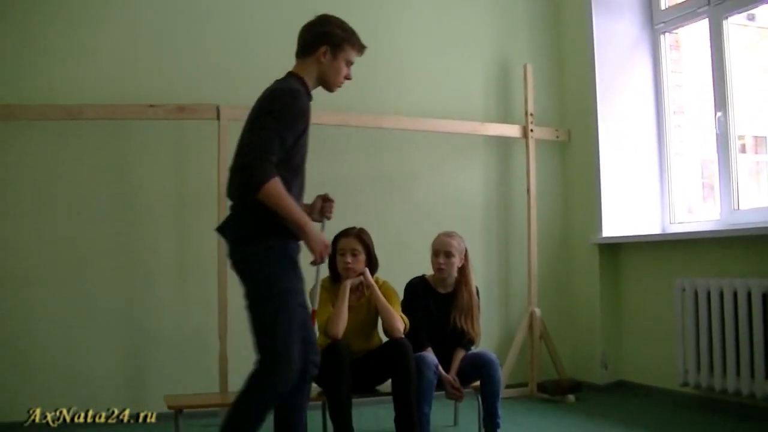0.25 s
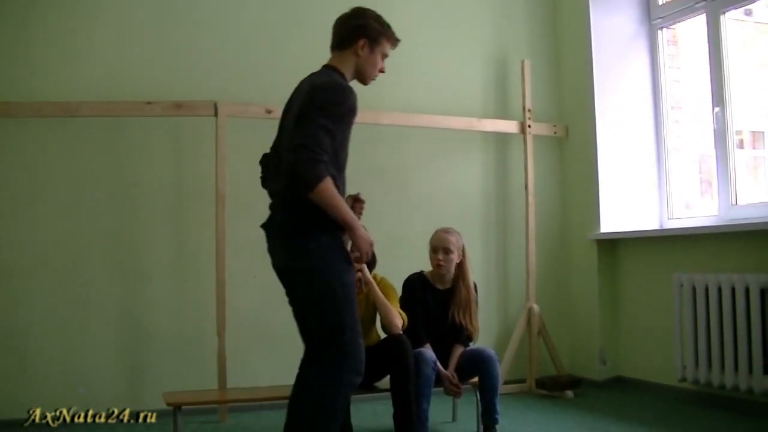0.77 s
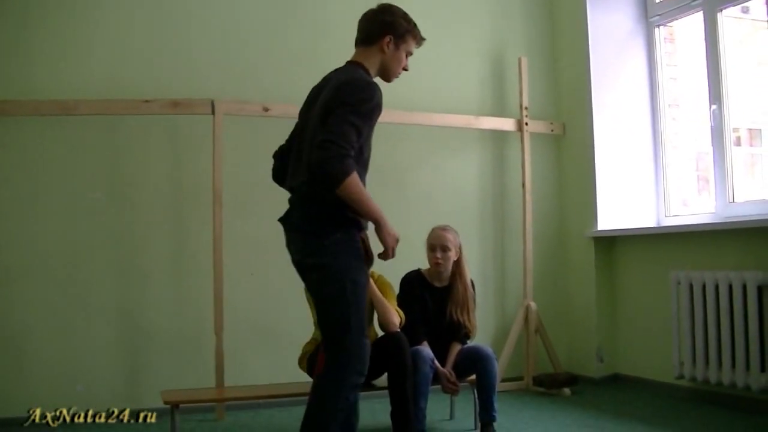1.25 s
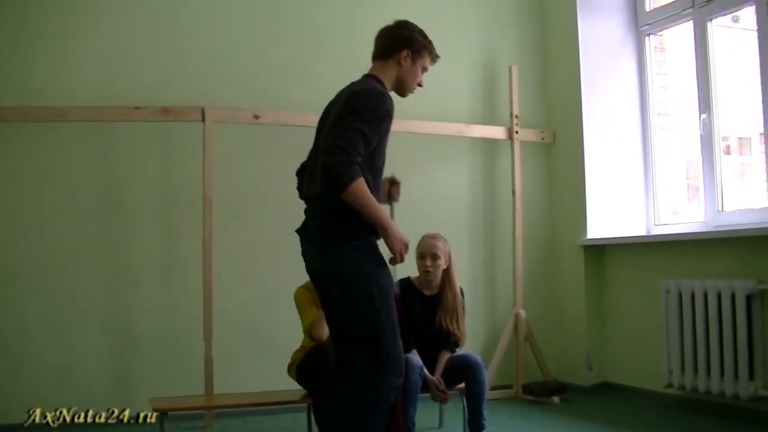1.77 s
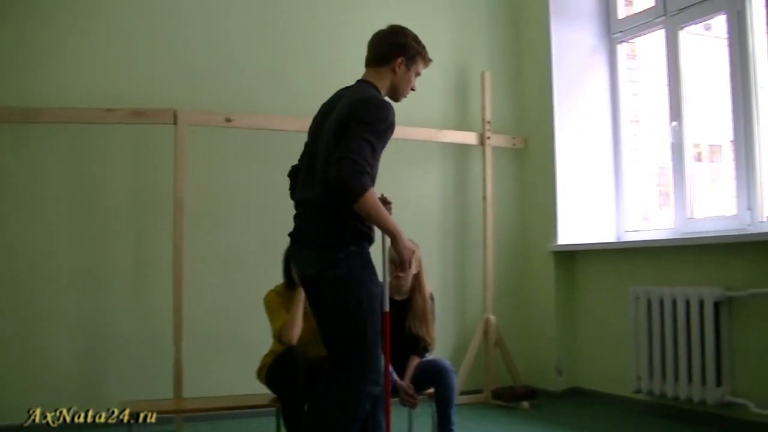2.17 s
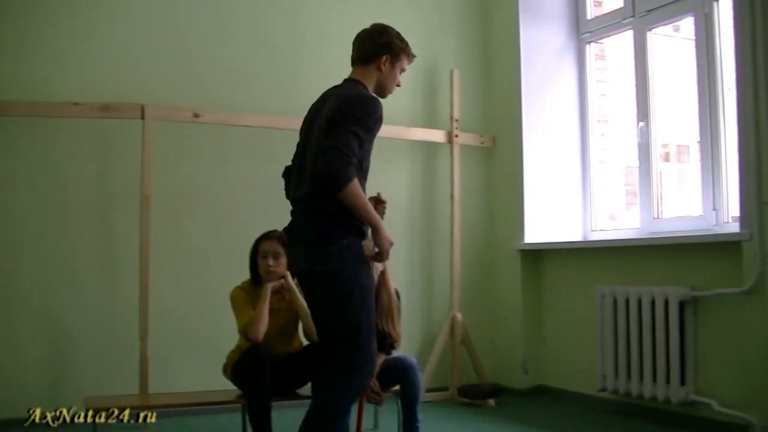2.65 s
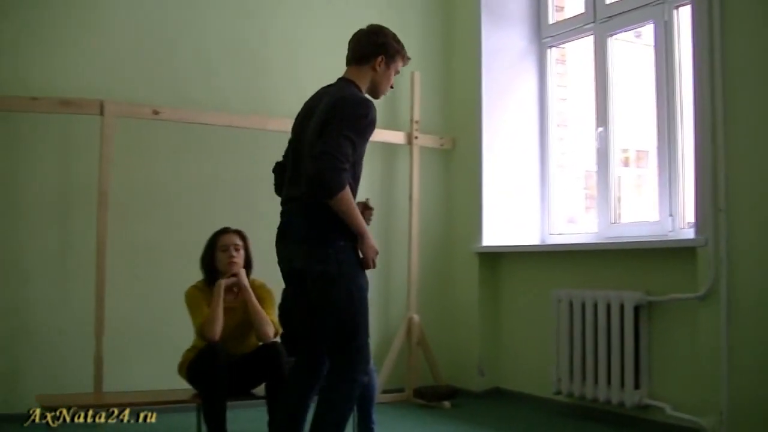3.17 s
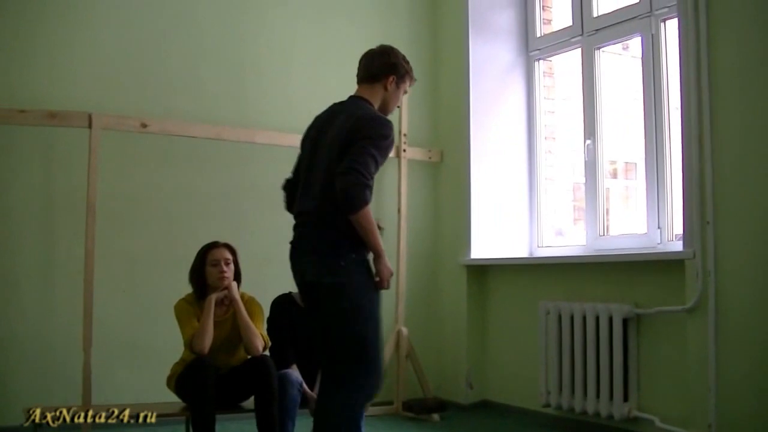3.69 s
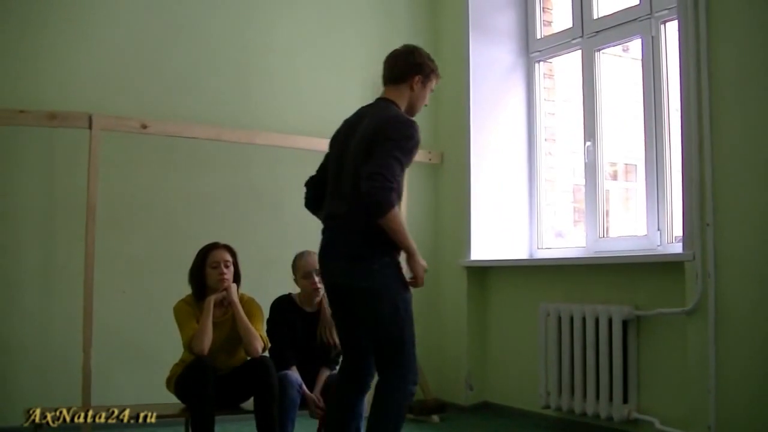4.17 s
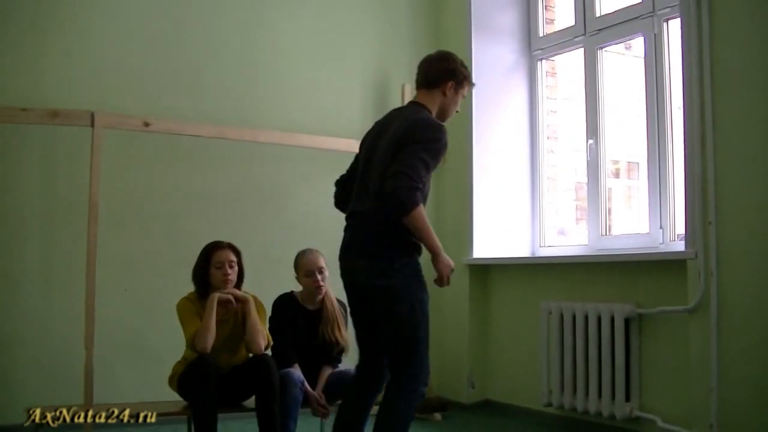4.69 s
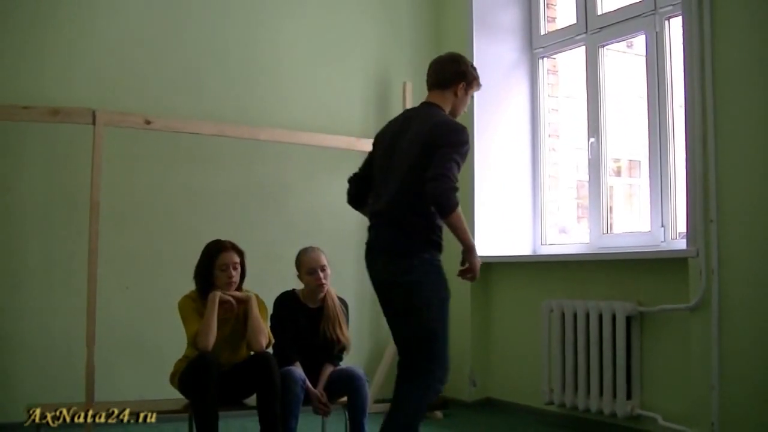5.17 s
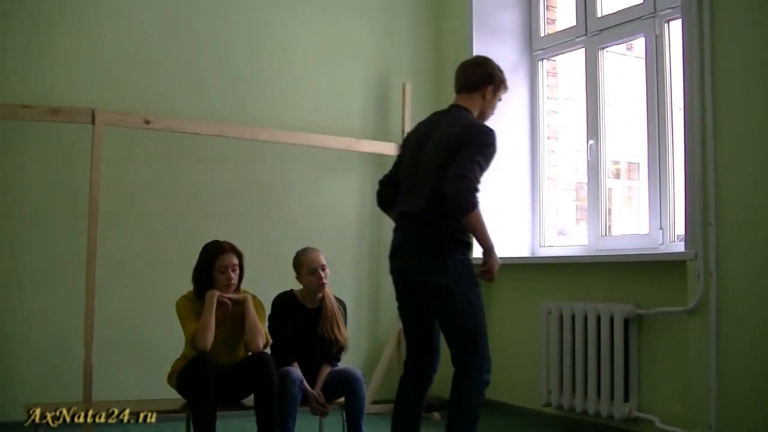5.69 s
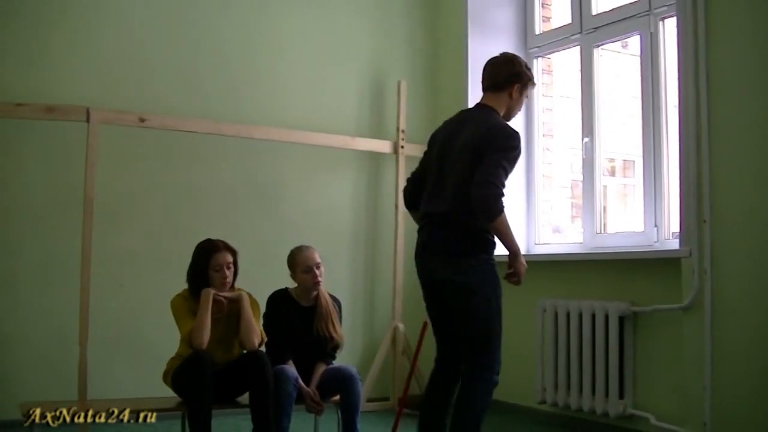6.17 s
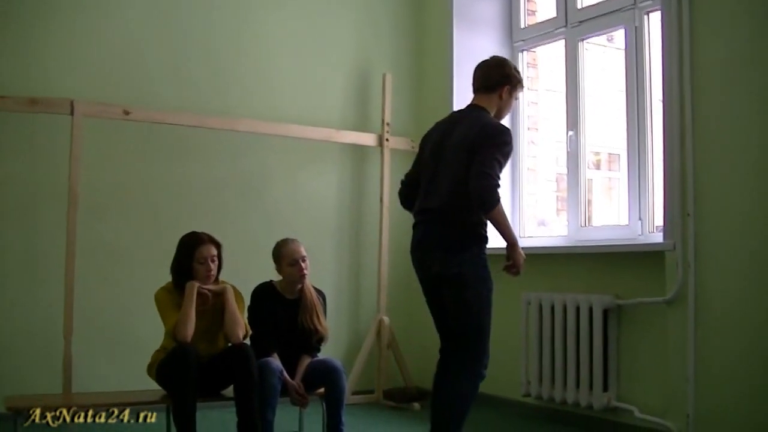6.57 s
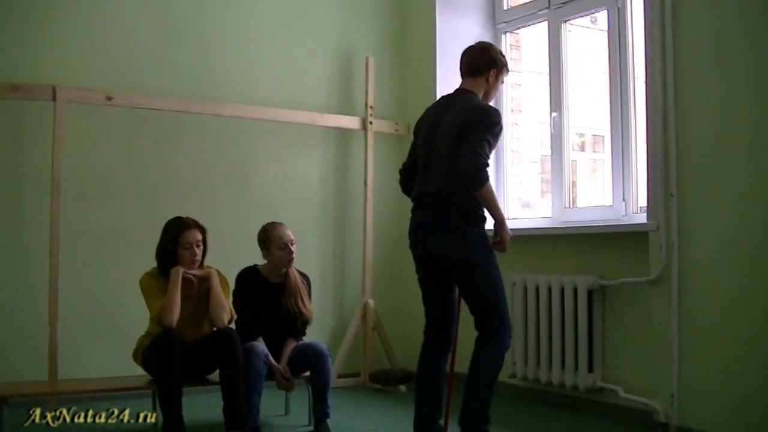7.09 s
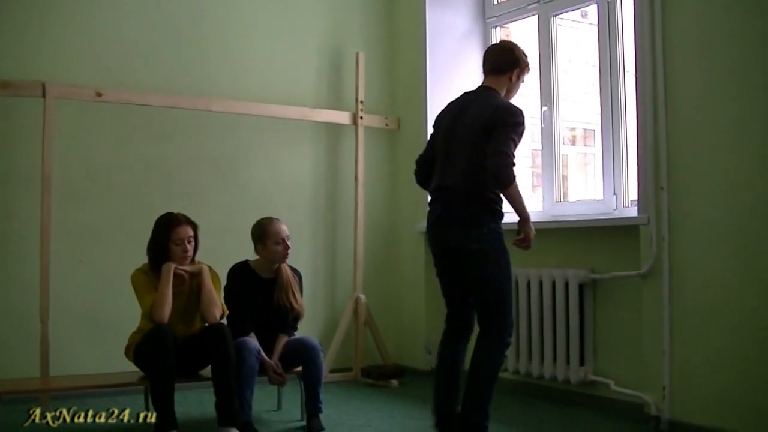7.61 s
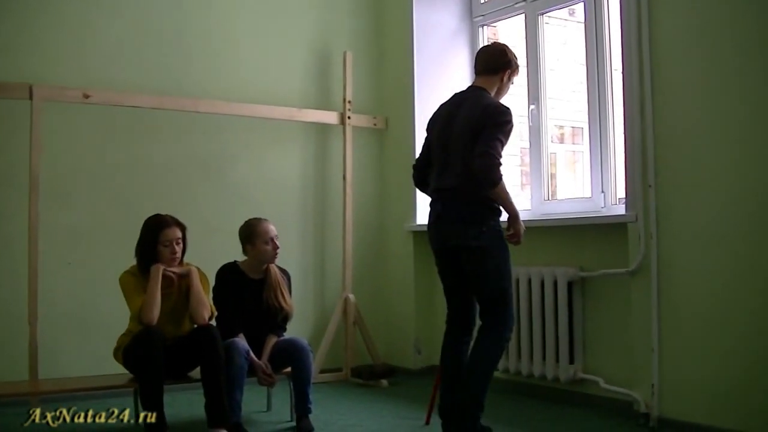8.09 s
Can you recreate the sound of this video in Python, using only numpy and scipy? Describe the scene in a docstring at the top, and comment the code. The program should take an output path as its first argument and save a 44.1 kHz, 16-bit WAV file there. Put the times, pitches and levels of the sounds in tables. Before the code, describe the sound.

Three hollow woody knocks of a walking stick, each a tip tap followed at once by a dull floor thump, echo off hard walls. The first is muffled and quieter, the later two brighter and louder. Between them come very quiet pats of soft soles and short irregular swishes of trousers. Room air, microphone hiss and a faint hum lie behind, with a low rumble swelling late. The microphone stands in the room, capturing plenty of echo.

```python
"""A metal walking stick knocks on the covered floor of a bare, ringing classroom as a man walks slowly.
Each knock is noise shaped by tip, floor and tube, heard through an echo, plus ringing standing waves.
Soft footfalls are shaped echoes too; trousers and soles swish as noise that swells with each stroke.
Behind them lie noise for room air and microphone hiss, a wavering hum, a faint dying ring made of tones,
and a low rumble, a tone with its octave, that swells late."""
import sys
import numpy as np
from scipy import signal
from scipy.fft import rfft, irfft, next_fast_len
from scipy.io import wavfile
from scipy.ndimage import uniform_filter1d, map_coordinates

SR = 44100
rng = np.random.default_rng(int(sys.argv[2]) if len(sys.argv) > 2 else 0)


def int16_out(signal):
    """Quantize to a 16-bit WAV file."""
    q = np.round(np.clip(np.atleast_2d(signal).T, -1, 1) * 32767)
    wavfile.write(sys.argv[1], SR, q.astype(np.int16))


N = 367794

# Knocks of the stick; all levels are trimmed further by the functions below:
# (time [s], knock level [dB], then relative to it: thump [dB], clack [dB], tube [dB], standing waves [dB],
#  tip hardness [Hz], delay until the weight lands [s], direct share of the thump [dB],
#  low floor resonance [Hz], its lift [dB], high floor resonance [Hz], its lift [dB])
STICK_KNOCKS = [(1.836, -35, -1.5, -20.5, -23, -11, 1480, 0.0071, -1, 296, 6, 778, 7.8),
                (4.292, -60, -5, -14, -18, -2, 1300, 0.00504, -8, 256, 14, 880, 2.6),
                (4.515, -26.5, -8.5, -14.5, -10, -15.5, 2800, .007, -6, 258, 4.6, 566, 4.9),
                (6.564, -24.5, -2.5, -15.5, -33.5, -5, 4860, 0.0086, -3, 333, 13, 703, 9.8)]


def stick():
    """The tip lands; a moment later the weight comes down, the floor thumps and the shaft rattles."""
    out = np.zeros((2, N))
    for (s, db, thump_db, clack_db, tube_db, waves_db, hard_hz, lag, direct_db,
         low_hz, low_db, high_hz, high_db) in STICK_KNOCKS:
        tip = room(direct_db=-20, early_db=-10, early_s=0.034, rise_s=0.0068)
        add(out, amp(db - 8) * floor_knock(tip, high_hz, high_db), s)
        add(out, amp(db + clack_db - 6) * hard_clack(tip, hard_hz), s)

        weight_s = s + lag
        weight = room(direct_db, early_db=-19.5, early_s=0.011, rise_s=0.0034)
        add(out, amp(db + thump_db - 3.5) * floor_thump(weight, low_hz, low_db), weight_s)
        shaft = room(direct_db=-4, early_db=7.5, early_s=0.025, rise_s=0.002)
        add(out, amp(db + tube_db - 11) * struck(shaft, tube), weight_s)
        add(out[:1], amp(db + waves_db) * standing_waves()[None], weight_s)
    return out


# Knocking part of the floor's sound: (frequency [Hz], level [dB per Hz])
KNOCK_TONE = [(250, -20.5), (400, -3.5), (490, 2.5), (600, -1), (690, -3.5), (830, -3), (980, -8.5),
              (1100, -13), (1300, -23), (1700, -39), (4000, -78.5)]


def floor_knock(echo, resonance_hz, lift_db):
    """The floor answers the tip, lifted at a resonance of that spot."""
    return struck(echo, lambda hz: causal(KNOCK_TONE, hz) * bump(hz, resonance_hz, width_hz=60, db=lift_db))


# Hard contact of the tip: (frequency [Hz], level [dB per Hz])
CLACK_TONE = [(700, -31), (1150, 3), (1420, 6), (1650, 2), (2200, 1.5), (3000, -3.5), (3800, -6.5),
              (5000, -11), (7000, -31.5), (14000, -47.5)]


def hard_clack(echo, hard_hz):
    """A soft landing lasts longer and so loses its treble, above the hardness frequency."""
    return struck(echo, lambda hz: causal(CLACK_TONE, hz) / (1 + 1j * hz / hard_hz) ** 2)


# Dull part of the floor's sound: (frequency [Hz], level [dB per Hz])
THUMP_TONE = [(30, -28.5), (62, -8.5), (82, -10), (102, -9.5), (140, -6), (200, -4), (300, 3), (400, -0.5),
              (520, -14), (900, -74)]


def floor_thump(echo, resonance_hz, lift_db):
    """The weight pushes the floor, which sounds dully, lifted at a low resonance of that spot."""
    return struck(echo, lambda hz: causal(THUMP_TONE, hz) * bump(hz, resonance_hz, width_hz=130, db=lift_db))


# Bending resonances of the metal tube: (frequency [Hz], width [Hz], level [dB])
TUBE_MODES = [(2020, 120, 0.5), (2076, 64, 6), (2260, 230, 2), (2550, 32, 5.5), (2760, 56, -5),
              (3370, 120, -7), (3790, 110, -8.5)]
# How strongly the blow drives the tube: (frequency [Hz], level [dB])
TUBE_DRIVE = [(500, -14.5), (1200, 2), (4000, -5.5), (6000, -8.5), (9000, -29.5), (15000, -51)]


def tube(hz):
    """The shaft bends at its resonances; the padded tip hardly reaches the highest ones."""
    modes = 0
    for k, (centre, width, db) in enumerate(TUBE_MODES):
        sign = (-1) ** k  # neighbouring resonances move in opposite directions
        modes = modes + sign * amp(db) * resonance(hz, centre, width)
    return modes * causal(TUBE_DRIVE, hz)


# Standing waves between the walls: (frequency [Hz], level [dB], time to fall 60 dB [s])
WALL_WAVES = [(62.8, -23.5, 2.1), (75, -28.5, 1.9), (100, -24, 1.3), (180.1, -8, 1.0), (257.5, -5, 1),
              (306, -9.5, 1.1), (382, -11.5, 1.62), (457, -7, 0.79), (554, -12.5, 0.89), (599, -10.5, 0.96),
              (674, -14, 0.62), (958, -12.5, 0.85)]


def standing_waves():
    """The weight on the floor sets tones between the walls ringing, a little differently each time."""
    t = np.arange(2 * SR) / SR
    waves = np.zeros(len(t))
    for hz, db, t60 in WALL_WAVES:
        fading = amp(db + rng.normal(0, 1) - 60 * t / t60)
        waves += fading * np.sin(2 * np.pi * (hz * t + rng.random()))
    return waves * (1 - np.exp(-t / 0.0099))  # builds up over about 10 ms


# Soft footfalls, levels trimmed further in footfalls():
# (time [s], pat level [dB], then relative to it: boom [dB], scuff [dB])
FOOTFALLS = [(0.002, -54.5, -12, -26), (0.621, -62, -29, -3.5), (2.974, -67, 3, -4.5)]
# Tone of the pat, the floor's boom and the scuff: (frequency [Hz], level [dB])
PAT_TONE = [(60, -26), (90, -7), (125, -8), (175, 0), (215, -5), (260, -4.5), (420, -7.5),
            (700, -20.5), (2000, -37), (6000, -54)]
BOOM_TONE = [(22, -2.5), (45, -3), (65, -1.5), (100, -12), (200, -37), (600, -67)]
SCUFF_TONE = [(300, -3.5), (800, 3.5), (3000, -8), (7000, -4), (11000, -15), (15000, -25)]


def footfalls():
    """Soft soles give a dull pat, a low boom of the floor and a short scuff."""
    out = np.zeros((2, N))
    for s, db, boom_db, scuff_db in FOOTFALLS:
        echo = room(direct_db=-14, early_db=-18, early_s=0.023, rise_s=0.0024)
        pat = struck(echo, lambda hz: causal(PAT_TONE, hz))
        boom = struck(echo, lambda hz: causal(BOOM_TONE, hz))
        add(out, amp(db - 4) * pat, s)
        add(out, amp(db + boom_db - 3.5) * boom, s)

        slide = room(direct_db=-80, early_db=-20, early_s=0.02, rise_s=0.02)  # almost no direct sound
        scuff = struck(slide, lambda hz: causal(SCUFF_TONE, hz))
        add(out, amp(db + scuff_db + 1) * scuff, s)
    return out


# Strokes of cloth and soles, levels before the fine wobble:
# (time of fastest rubbing [s], rise [s], swish level [dB], crisp top relative to it [dB])
STROKES = [(0.072, 0.076, -73, -7), (0.156, 0.026, -65.5, -8.0), (0.474, 0.075, -66.5, -7),
           (0.639, 0.0075, -62, -2), (1.218, 0.084, -67.5, -5.5), (1.677, 0.071, -58.5, -3.5),
           (2.26, 0.048, -67.5, -10.0), (2.374, 0.047, -64.5, -6), (2.83, 0.027, -67.0, -3.5),
           (2.951, 0.03, -58.5, -2), (3.326, 0.032, -71, -6), (3.52, 0.044, -63, -6),
           (3.796, 0.051, -72.5, -4.5), (3.99, 0.084, -67, -5.0), (4.185, 0.017, -73.5, -3.5),
           (4.87, 0.061, -67, -7), (4.945, 0.045, -63.5, -14), (5.045, 0.036, -61.0, -9.0),
           (5.32, 0.039, -68.0, -4.5), (5.507, 0.08, -62.5, -10), (5.61, 0.056, -58, -7),
           (6.087, 0.059, -62.5, -3.5), (6.174, 0.056, -63.5, -1.5), (6.295, 0.102, -64.0, -9.0),
           (6.394, 0.073, -65, -7), (6.91, 0.059, -64, -6.5), (6.985, 0.067, -60.5, -7.5),
           (7.055, 0.051, -63, -8), (7.119, 0.013, -65.5, -4.5), (7.539, 0.086, -69, -9.5),
           (7.697, 0.04, -62.5, -7.5), (8.199, 0.075, -68, -6.5), (8.283, 0.017, -67.5, -15)]
# Tone of the rubbing cloth: (frequency [Hz], level [dB per Hz])
CLOTH_TONE = [(210, -40.5), (350, -3.5), (546, -7.5), (591, -1.5), (714, -4), (935, -2.5), (1580, -3),
              (2130, 2.5), (3830, 0.5), (5430, -1), (9020, -14), (13800, -62), (15500, -43.5)]
# Tone of the crisp top: (frequency [Hz], level [dB per Hz])
CRISP_TONE = [(3000, -26.5), (6500, 7), (9000, 2), (12000, -6), (15500, -19.5)]
SWISH_FALL_S = 0.042  # every stroke stops this quickly
SWISH_ECHO_DB, SWISH_T60_S = -3, 0.55  # the room holds each swish; T60 is the time to fall 60 dB
RUSTLE_DB = -80.5  # steady cloth rustle under the strokes


def swishes():
    """Cloth and soles rub: each stroke speeds up and stops, a broad swish with a crisp top."""
    t = np.arange(N) / SR
    swish_power, crisp_power = np.zeros((2, N))
    for s, rise_s, db, top_db in STROKES:
        near = slice(max(round(s * SR) - SR // 2, 0), round(s * SR) + SR // 4)
        u = t[near] - s
        stroke = np.exp(-(u / np.where(u < 0, rise_s, SWISH_FALL_S)) ** 2)
        swish_power[near] += amp(db) ** 2 * stroke
        crisp_power[near] += amp(db + top_db) ** 2 * stroke

    keep = amp(-60 / (SWISH_T60_S * SR)) ** 2  # share of the echo's power left after one sample
    echo_power = amp(SWISH_ECHO_DB) ** 2 * signal.lfilter([1 - keep], [1, -keep], swish_power)
    body = noise(CLOTH_TONE) * np.sqrt(swish_power + echo_power + amp(RUSTLE_DB) ** 2)
    crisp = noise(CRISP_TONE) * np.sqrt(crisp_power)
    catch_db = 0.76 * wobble(120) + 0.51 * wobble(25)  # fibres catch and slip
    return (body + crisp) * amp(catch_db)


# Surges of the low rumble: (time [s], level [dB] that the fade starts from)
RUMBLE_SURGES = [(5.64, -63), (6.58, -64), (7.14, -65.5)]
RUMBLE_HZ, OCTAVE_DB = 37.2, -10  # pitch, and level of the octave relative to it
SURGE_RISE_S, SURGE_FADE_DB_PER_S = 0.09, 15


def rumble():
    """A low tone with its octave surges up quickly and dies away slowly; its pitch wavers a little."""
    t = np.arange(N) / SR
    power = np.zeros(N)
    for s, db in RUMBLE_SURGES:
        age = np.maximum(t - s, 0)
        rise = np.minimum(age / SURGE_RISE_S, 1)
        power += (amp(db - SURGE_FADE_DB_PER_S * age) * rise) ** 2
    turn = 2 * np.pi * RUMBLE_HZ * t + 1.1 * wobble(2)
    return np.sqrt(power) * (np.sin(turn) + amp(OCTAVE_DB) * np.sin(2 * turn))


# Steady hum, levels trimmed in hum(): (frequency [Hz], level [dB])
HUM_TONES = [(59.2, -82.5), (150.7, -81)]


def hum():
    """Low tones waver slowly in level and pitch."""
    t = np.arange(N) / SR
    out = np.zeros(N)
    for hz, db in HUM_TONES:
        level = amp(db - 0.5 + 2.5 * wobble(4.3))
        out += level * np.sin(2 * np.pi * hz * t + 1.2 * wobble(8.7))
    return out


# Faint high ring, levels trimmed in dying_ring(): (frequency [Hz], level [dB])
RING_TONES = [(3214, -82), (3628, -97)]


def dying_ring():
    """High tones with a trembling pitch fade from the start, by 60 dB in 4 s."""
    t = np.arange(N) / SR
    out = np.zeros(N)
    for hz, db in RING_TONES:
        out += amp(db + 5 - 60 * t / 4) * np.sin(2 * np.pi * hz * t + 0.9 * wobble(25))
    return out


# Room air falling into microphone hiss: (frequency [Hz], level [dB per Hz])
AIR_TONE = [(12, -28), (22, -10), (56, 1.5), (85, -7.5), (150, -8), (250, -9.5), (400, -10.5), (600, -11),
            (1000, -13.5), (1600, -17.5), (4000, -21), (8000, -23.5), (12000, -26.5), (15500, -30)]
AIR_DB = -72


def background():
    """Steady noise of room air and hiss, with the low rumble, hum and dying ring in the middle."""
    out = amp(AIR_DB) * noise(AIR_TONE)
    out[0] += rumble() + hum() + dying_ring()
    return out


# The room's ring: (frequency [Hz], time to fall 60 dB [s])
ROOM_RING = [(60, 1.93), (150, 1.3), (300, 0.99), (500, 0.9), (800, 0.74), (1400, 0.67), (2500, 0.64),
             (5000, 0.34), (12000, 0.1)]


def room(direct_db, early_db, early_s, rise_s):
    """Mid and side echo of one blow: direct sound, a cluster off the near walls, then the diffuse ring."""
    t = np.arange(SR + SR // 2) / SR
    hz, frames, z = signal.stft(rng.standard_normal((2, len(t))), SR, nperseg=512)
    fade = amp(-60 * frames / along(ROOM_RING, hz)[:, None])
    echo = signal.istft(z * fade, SR, nperseg=512)[1][:, :len(t)]
    build_up = 1 - np.exp(-t / rise_s)
    near_walls = 1 + amp(early_db) * np.exp(-t / early_s)
    echo *= build_up * near_walls
    # even out the random echo's broad spectrum so that each blow keeps its own tone;
    # fine peaks and dips remain
    spectrum = rfft(echo)
    smooth_power = np.abs(uniform_filter1d(np.abs(spectrum) ** 2, size=120))
    spectrum /= np.sqrt(smooth_power + 1e-12)
    echo = irfft(spectrum) * (t < 1.2)
    echo[0, 0] += amp(direct_db)
    return echo


def struck(echo, response):
    """A body's response heard through the room, its mid at rms 1 over the first tenth of a second."""
    sound = filtered(echo, response)
    return sound / np.sqrt(np.mean(sound[0, :SR // 10] ** 2))


def resonance(hz, centre_hz, width_hz):
    """Response of one springy body: 1 at its centre, less on both sides."""
    damping = 1j * hz * width_hz
    return damping / (centre_hz ** 2 - hz * hz + damping)


def bump(hz, centre_hz, width_hz, db):
    """A resonance that lifts the response by db at its centre."""
    return 1 + (amp(db) - 1) * resonance(hz, centre_hz, width_hz)


def amp(db):
    """Decibels to gain."""
    return 10 ** (np.asarray(db) / 20)


def unit(x):
    """Scale to rms 1."""
    return x / np.sqrt(np.mean(x ** 2) + 1e-20)


def along(points, hz):
    """Read (Hz, value) points on a log frequency axis."""
    f, v = np.transpose(points)
    return np.interp(np.log(hz + 1), np.log(f + 1), v)


def wobble(rate):
    """A smooth random curve shaped by rate random values a second."""
    knots = rng.standard_normal(int(N * rate / SR) + 4)
    coarse = np.arange(0, N + 64, 64)  # worked out at every 64th sample
    curve = map_coordinates(knots, [coarse * rate / SR])
    return np.interp(np.arange(N), coarse, curve)


def filtered(x, response):
    """Multiply the spectrum of x by a response of frequency."""
    n = x.shape[-1]
    m = next_fast_len(n + SR // 2)
    return irfft(rfft(x, m) * response(np.fft.rfftfreq(m, 1 / SR)), m)[..., :n]


def causal(points, hz):
    """Response with the gain of (Hz, dB) points that reacts as early as it can (minimum phase)."""
    cepstrum = irfft(np.log(amp(along(points, hz))))
    half = len(cepstrum) // 2
    cepstrum[1:half] *= 2
    cepstrum[half + 1:] = 0
    return np.exp(rfft(cepstrum))


def noise(points):
    """Mid and side noise of rms 1 with the given (Hz, dB) spectrum."""
    return unit(filtered(rng.standard_normal((2, N)), lambda hz: amp(along(points, hz))))


def add(track, sound, s):
    """Mix a sound into a track at time s."""
    part = track[:, max(round(s * SR), 0):][:, :sound.shape[1]]
    part += sound[:, :part.shape[1]]


def stereo(pair, width):
    """Left and right from mid and side, with the side turned down by (Hz, dB) points."""
    side = filtered(pair[1], lambda hz: amp(along(width, hz)))
    return np.array([pair[0] + side, pair[0] - side])


# Stereo width of knocks and footfalls: (frequency [Hz], side level [dB])
BLOW_WIDTH = [(30, -14), (125, -26), (300, -37.5), (700, -27.5), (1400, -20.5), (4000, -12.5),
              (12000, -17.5)]
# Stereo width of swishes and background: (frequency [Hz], side level [dB])
NOISE_WIDTH = [(60, -14.5), (110, -4), (200, -3.5), (380, -5.5), (700, -7.5), (1290, -8.5), (2380, -12.5),
               (4400, -15.5), (8120, -15.5), (15000, -30.5)]


def scene():
    """Two closely spaced microphone capsules hear almost the same sound."""
    blows = stereo(stick() + footfalls(), BLOW_WIDTH)
    return blows + stereo(swishes() + background(), NOISE_WIDTH)


TOP_HZ = 15600  # band limit


def record(dry):
    """Nothing is kept above the band limit."""
    return filtered(dry, lambda hz: hz < TOP_HZ)


dry = scene()
out = record(dry)
int16_out(out)
```